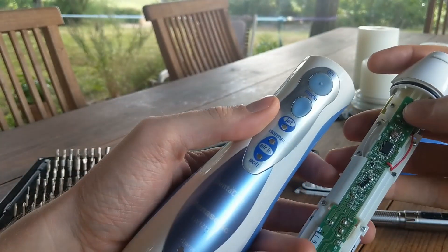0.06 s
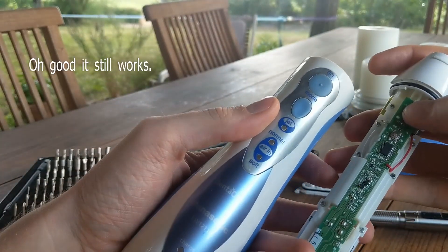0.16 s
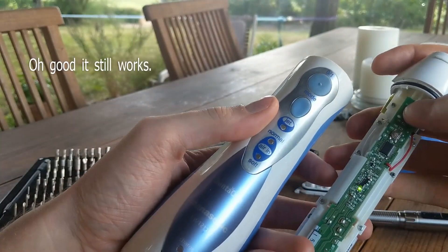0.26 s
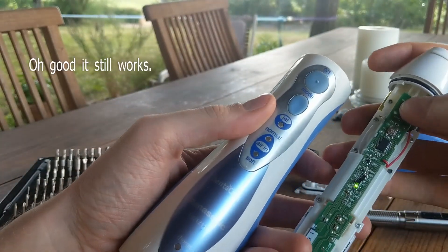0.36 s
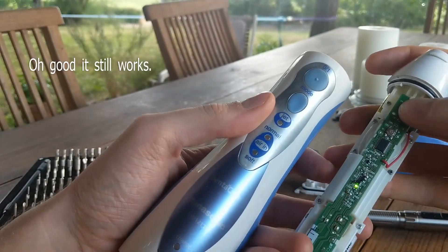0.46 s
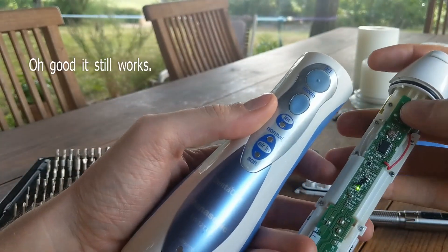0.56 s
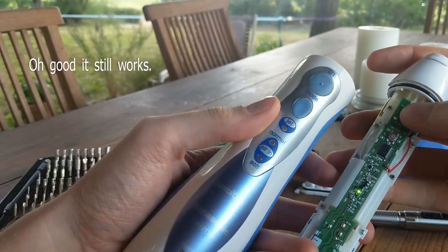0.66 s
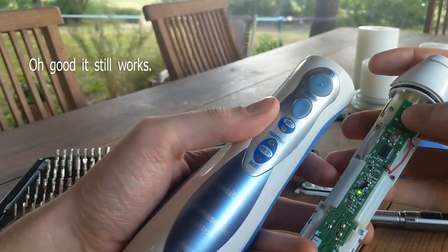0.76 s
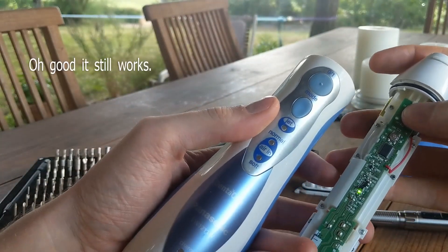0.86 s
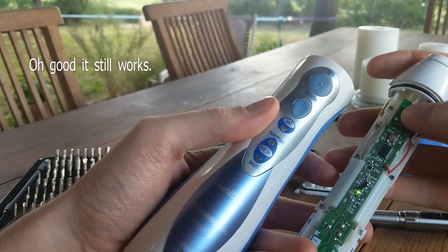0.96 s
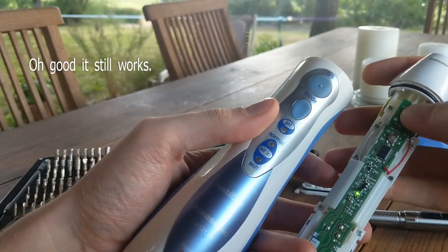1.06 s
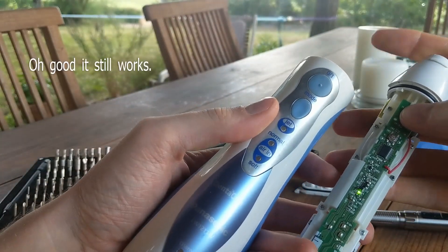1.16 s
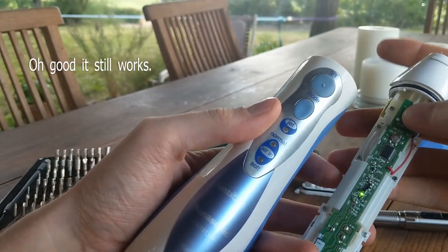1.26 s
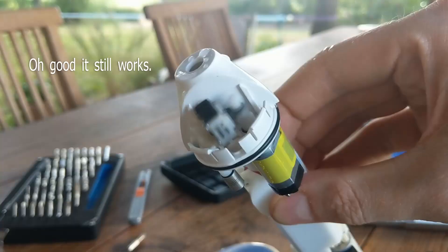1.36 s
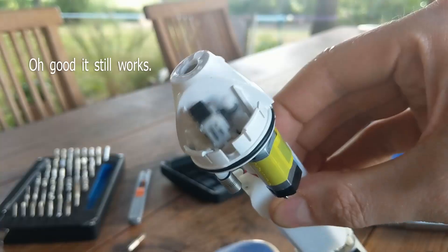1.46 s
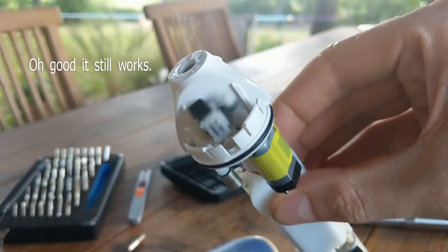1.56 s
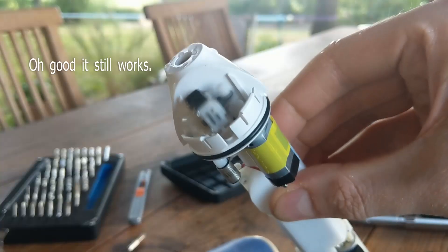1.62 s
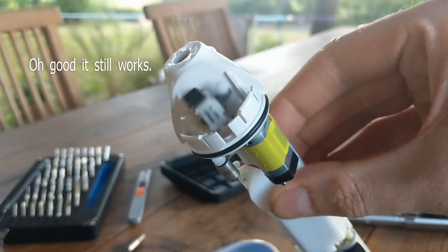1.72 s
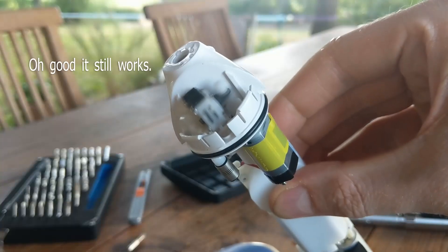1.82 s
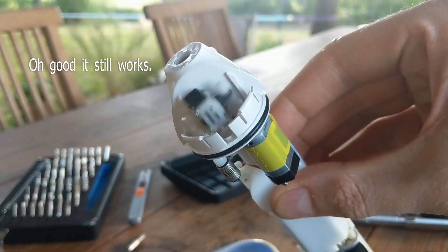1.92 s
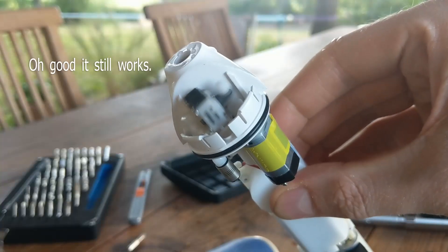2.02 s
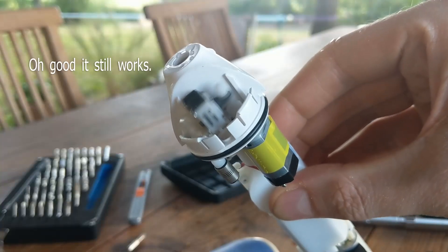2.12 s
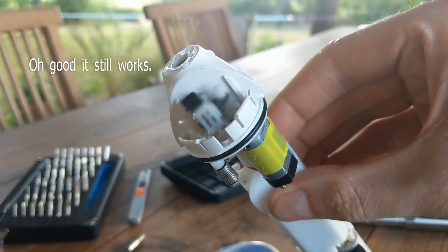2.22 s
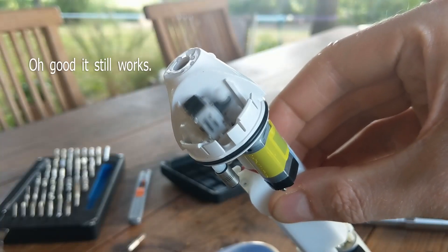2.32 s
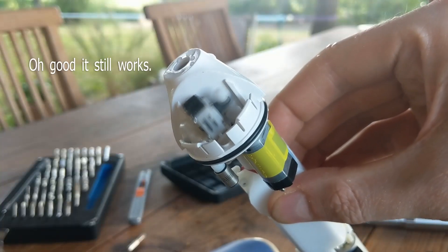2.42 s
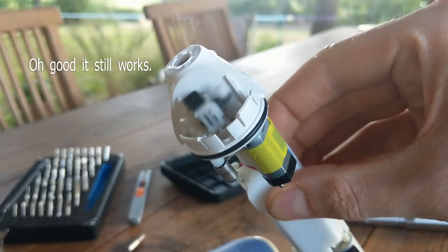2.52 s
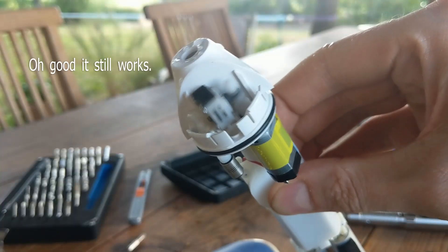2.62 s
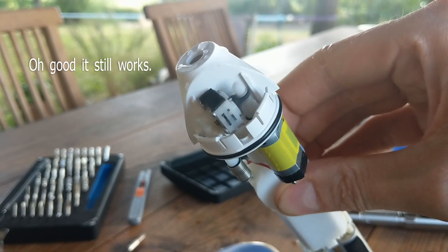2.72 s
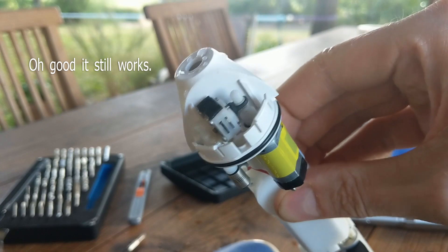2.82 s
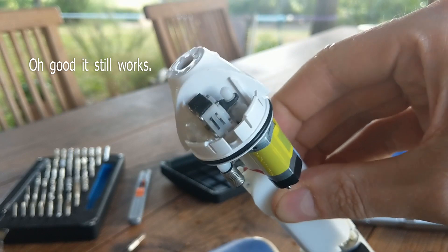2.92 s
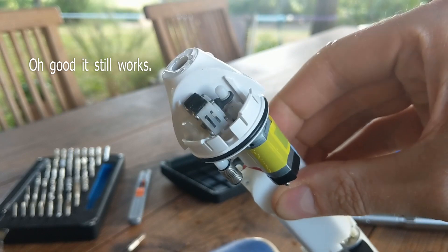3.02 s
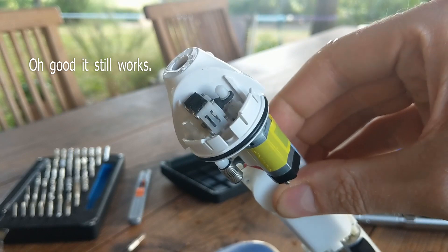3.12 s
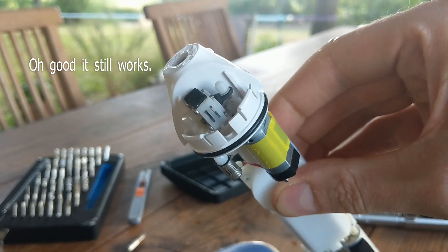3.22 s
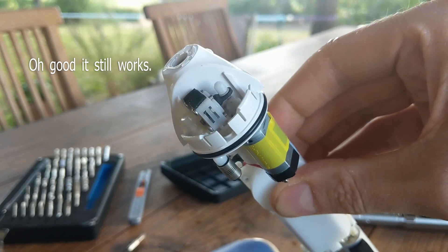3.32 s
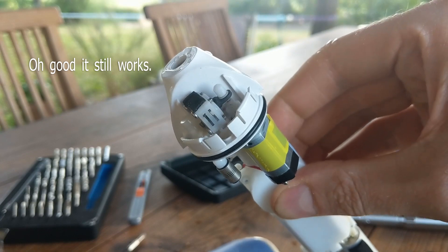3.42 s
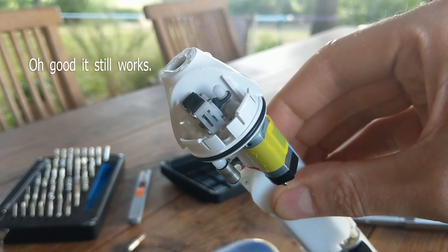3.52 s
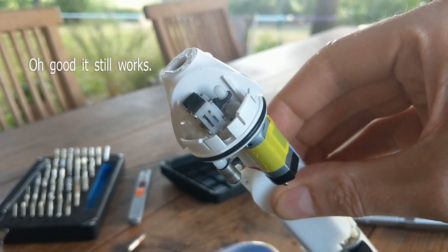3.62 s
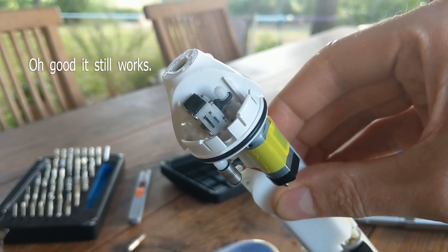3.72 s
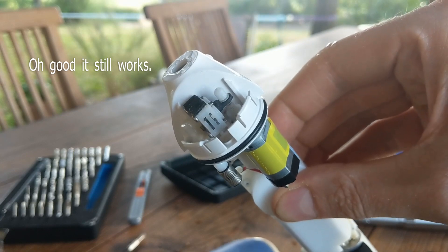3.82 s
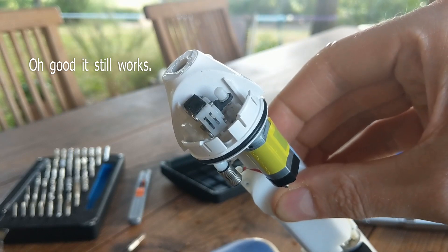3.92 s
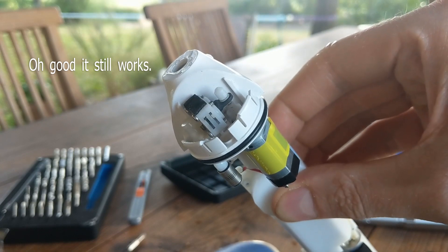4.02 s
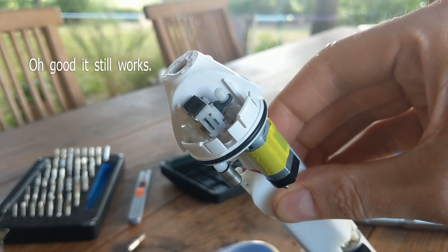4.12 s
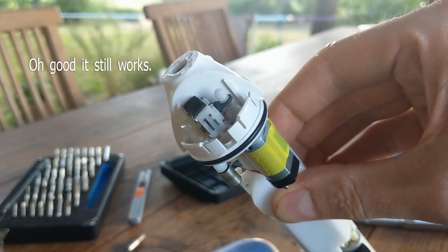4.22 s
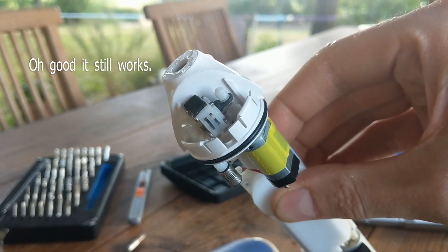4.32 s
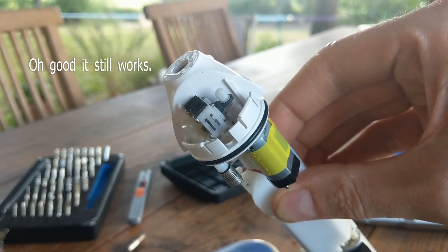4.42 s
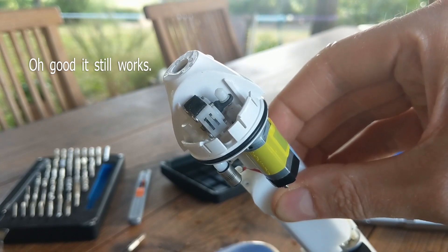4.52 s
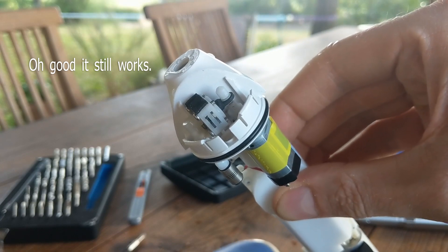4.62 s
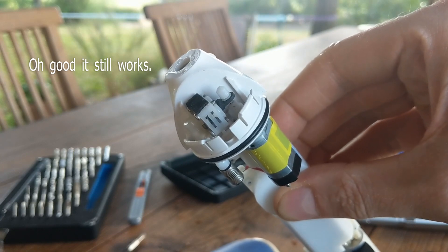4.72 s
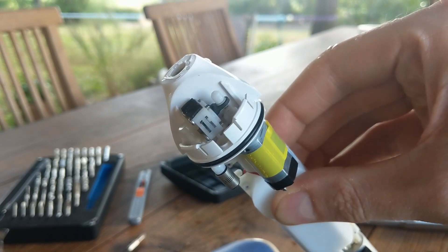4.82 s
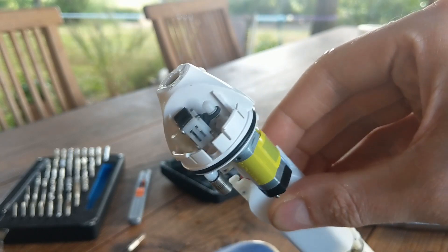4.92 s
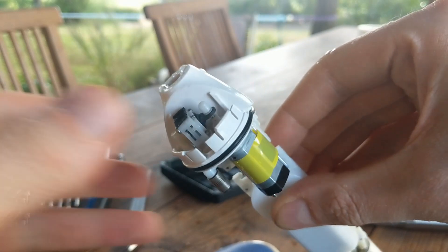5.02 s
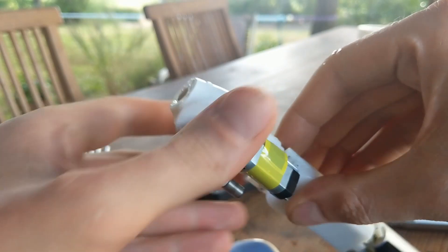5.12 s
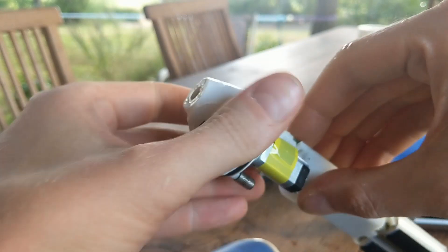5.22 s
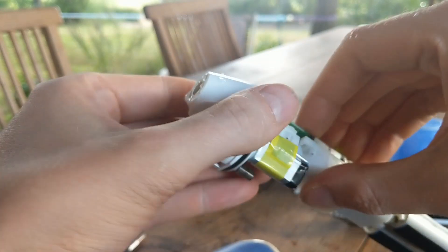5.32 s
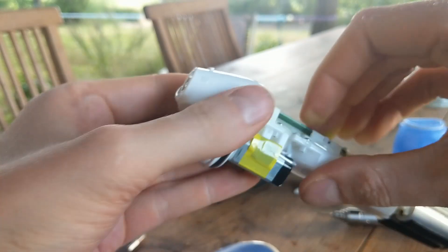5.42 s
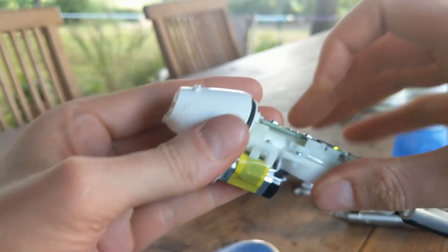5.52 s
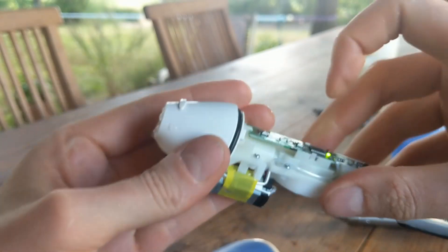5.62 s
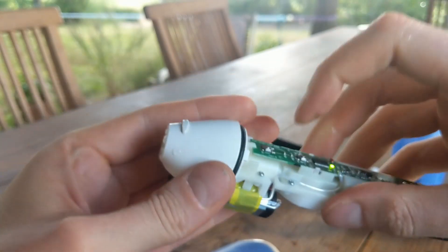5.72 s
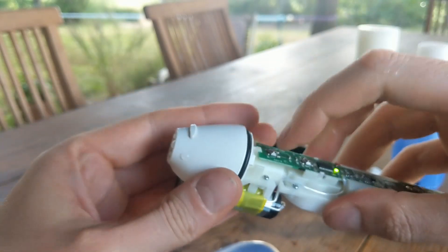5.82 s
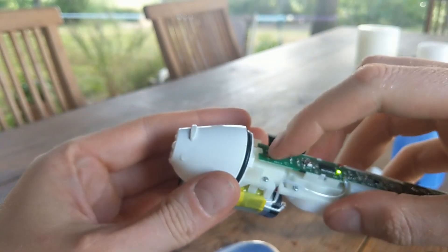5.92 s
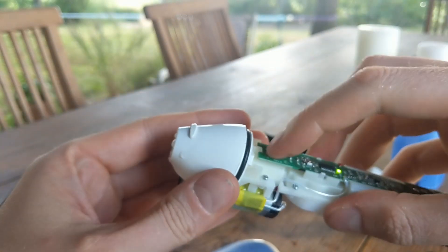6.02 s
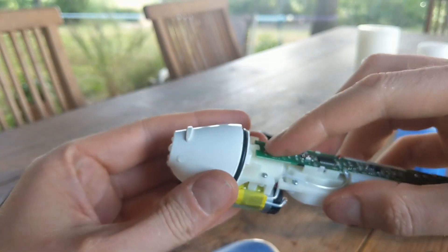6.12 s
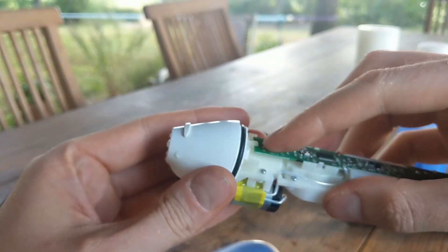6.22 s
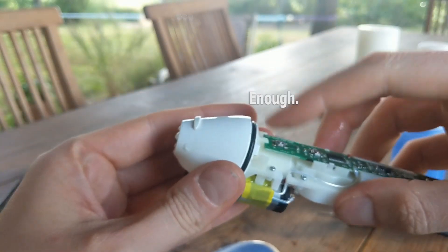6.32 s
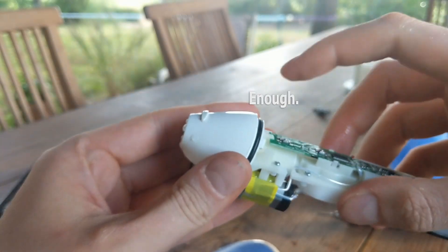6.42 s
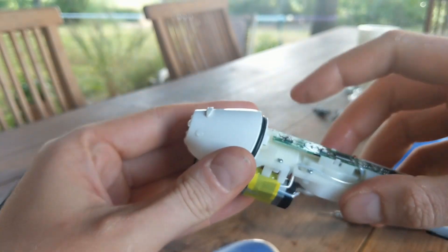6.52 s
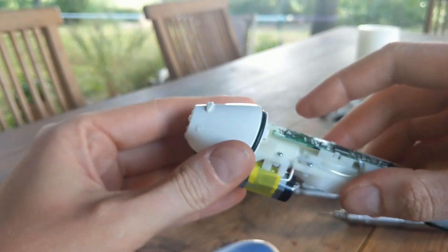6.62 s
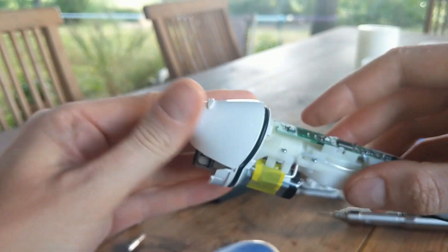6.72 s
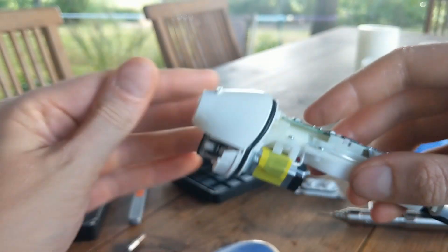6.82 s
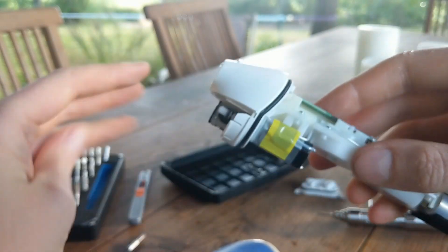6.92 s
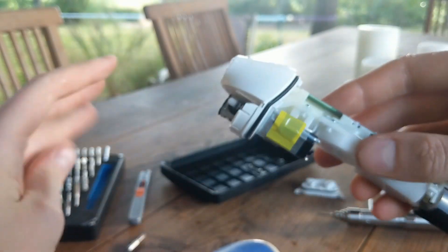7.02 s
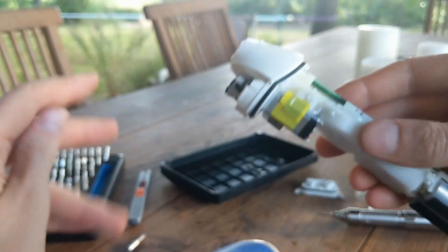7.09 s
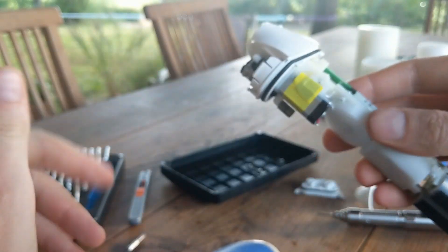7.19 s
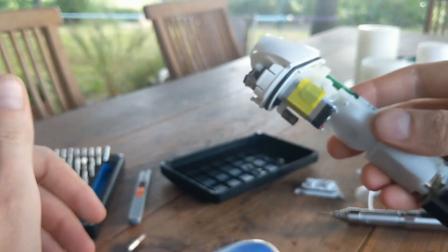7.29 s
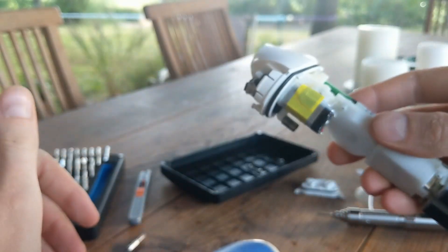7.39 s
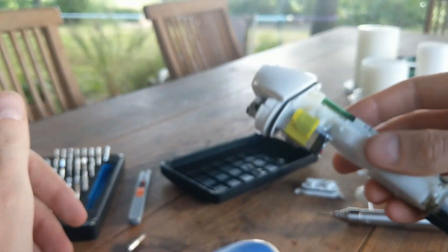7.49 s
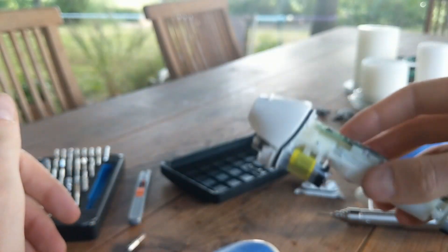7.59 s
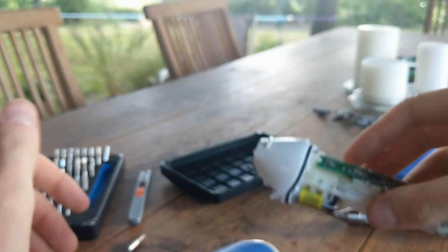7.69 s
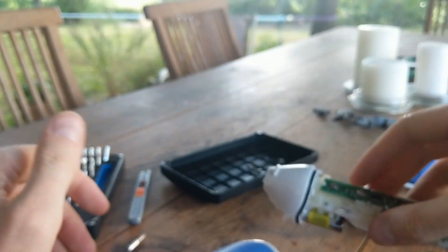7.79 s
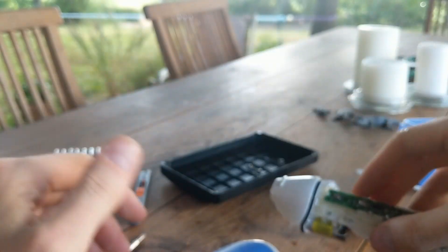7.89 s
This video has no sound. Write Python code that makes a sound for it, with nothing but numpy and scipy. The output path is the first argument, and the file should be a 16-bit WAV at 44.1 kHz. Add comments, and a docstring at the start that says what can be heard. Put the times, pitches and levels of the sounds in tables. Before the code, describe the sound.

Quiet outdoor air and a faint, distant engine drone lie under everything, and all sound is on the left channel. At about 0.3 seconds the small motor of an opened water flosser starts buzzing close by, its pitch wavering slightly. From 0.9 to 1.4 seconds loose parts clack quickly and dully. The buzz then turns abruptly brighter and closer, and near 1.9 seconds it dips in pitch and grows more rattly. It stops with sharp clicks at around 2.8 seconds. At 3.3 seconds another click restarts it, now pumping hard with rapid, even gear thuds, rasping and ticks. From about 5 seconds a hand cups the pump head, shifting the tone, with a hollow thumb knock at 5.4 seconds. The pump winds down quickly at 6.3 seconds with a small click. Fingers brush faintly over the plastic near 6.5 seconds and again just after 7.

```python
"""At a table outdoors, the small pump drive of an opened water flosser is run twice in the hand.
First it buzzes: the shaft knocks on the housing once a turn, the gear throbs and loose parts clack.
Then it pumps hard, its gear thudding and rasping under the load of each stroke, and a hand cups the
pump head. Fingers brush the plastic; a far engine drones in the quiet air. Only the left channel is live.
"""
import sys
import numpy as np
from scipy import signal
from scipy.fft import rfft, irfft
from scipy.io import wavfile
from scipy.ndimage import map_coordinates

SR = 44100
rng = np.random.default_rng(int(sys.argv[2]) if len(sys.argv) > 2 else 0)


def to_wav(s):
    """Save 16-bit WAV."""
    ch = np.atleast_2d(s).T  # columns
    pcm = np.round(np.clip(ch, -1, 1) * 32767)  # PCM
    wavfile.write(sys.argv[1], SR, pcm.astype(np.int16))


N = 350639
TIME = np.arange(N) / SR
# hollow of the hand cupped round the pump head: pitch_hz, width_hz, gain_db
HAND_HOLLOW = [(1503, 270, 0)]


def from_db(db):
    """Decibels to gain."""
    return 10 ** (np.asarray(db) / 20)


def rms_one(x):
    """Scale to rms 1."""
    return x / np.sqrt(np.mean(x ** 2) + 1e-20)


def along(rows):
    """One automation curve per column after the time, in straight lines."""
    times, *columns = np.transpose(rows)
    return [np.interp(TIME, times, column) for column in columns]


def blend(first, second, share):
    """Constant-power crossfade."""
    share = np.clip(share, 0, 1)
    return np.sqrt(1 - share) * first + np.sqrt(share) * second


def swell(age, attack, hold, release):
    """Rise, hold, then die away."""
    return np.clip(age / attack, 0, 1) * np.exp(-np.maximum(age - attack - hold, 0) / release)


def noise():
    """White noise."""
    return rng.standard_normal(N)


def drift(rate_hz):
    """Random wander between points of spread 1."""
    knots = rng.standard_normal(4000)
    return np.interp(TIME * rate_hz, np.arange(len(knots)), knots)


def add(out, start_s, sound):
    """Mix a sound in at a time."""
    start = round(start_s * SR)
    out[start:start + len(sound)] += sound[:N - start]


def butter(x, order, hz, kind):
    """Low-, high- or band-pass filter."""
    return signal.sosfilt(signal.butter(order, hz, kind, fs=SR, output="sos"), x)


def colour(x, spectrum, size=4096):
    """Minimum-phase EQ with the given curve, rolled off beyond its ends; rms 1."""
    hz, db = np.transpose(spectrum)
    grid = np.maximum(np.fft.rfftfreq(size, 1 / SR), 1)
    octaves_outside = np.abs(np.log2(grid / np.clip(grid, hz[0], hz[-1])))
    curve_db = np.interp(np.log(grid), np.log(hz), db) - 20 * np.minimum(octaves_outside, 2)
    cepstrum = irfft(np.log(from_db(curve_db)))
    cepstrum[1:size // 2] *= 2
    cepstrum[size // 2 + 1:] = 0
    impulse = irfft(np.exp(rfft(cepstrum)))
    return rms_one(signal.oaconvolve(x, impulse)[:N])


def bent_colour(x, spectrum, ratio):
    """EQ whose peaks slide in pitch by the given ratio."""
    clock = np.cumsum(ratio)
    warped = map_coordinates(x, [np.interp(np.arange(N), clock, np.arange(N))], order=3)
    return map_coordinates(colour(warped, spectrum), [clock], order=3)


def pole_pair(hz, width_hz):
    """Feedback coefficients of one resonance."""
    radius = np.exp(-np.pi * width_hz / SR)
    return [1, -2 * radius * np.cos(2 * np.pi * hz / SR), radius * radius]


def resonate(x, modes):
    """Parallel resonances of alternating sign."""
    x = x + 1e-18 * (np.arange(len(x)) % 3)   # keeps the tails clear of denormals
    out = 0
    for k, (hz, width, db) in enumerate(modes):
        poles = pole_pair(hz, width)
        gain = (-1) ** k * from_db(db) * (1 - poles[2]) / 2
        out = out + gain * signal.lfilter([1, 0, -1], poles, x)
    return out


def build_up(x, resonances):
    """All-pass resonances: the sound near each arrives a few milliseconds late."""
    for hz, width in resonances:
        poles = pole_pair(hz, width)
        x = signal.lfilter(poles[::-1], poles, x)
    return x


def contacts(turns, spread_db, jitter_s=0):
    """A click at every whole turn, each with its own strength and a small timing slip."""
    at = np.interp(np.arange(np.ceil(turns[0]), turns[-1]), turns, np.arange(N))
    size, late = rng.standard_normal((6000, 2))[:len(at)].T
    near = at.astype(int)
    at = at + late * (jitter_s * SR * np.ones(N))[near]
    strength = from_db(size * (spread_db * np.ones(N))[near])
    taps = at.astype(int)[:, None] + np.arange(-7, 9)
    offset = taps - at[:, None]
    # a windowed sinc lets each click land between samples
    clicks = np.sinc(offset) * np.cos(np.pi * offset / 16) ** 2 * strength[:, None]
    return rms_one(np.bincount(np.clip(taps, 0, N - 1).ravel(), clicks.ravel(), N))


def friction(cycles, fresh, size=1600):
    """The same worn surface passes on every cycle, so part of the scraping repeats."""
    surface = rng.standard_normal(size)
    repeating = map_coordinates(surface, [cycles % 1 * size], order=3, mode="grid-wrap")
    return rms_one(repeating + fresh * noise())


def tooth_knocks(strokes, spread_db=1.0, jitter_s=5e-5, count=5):
    """Teeth strike one after another in a fading run as the piston's load comes on."""
    # push and pull: start_strokes, spacing_strokes, level_db, loss_per_tooth_db, first_tooth_extra_db
    runs = [(.003, .068, 0, 2.6, -1), (.494, .075, -3, 2.2, 4.5)]
    out = 0
    for start, spacing, db, loss_db, first_db in runs:
        for k in range(count):
            gain = from_db(db - loss_db * k + first_db * (k == 0))
            out = out + gain * contacts(strokes - start - k * spacing, spread_db, jitter_s)
    return rms_one(out)


def blows(events, modes, grit, grit_s, size=3000):
    """At each event a click with a short gritty tail rings a few resonances."""
    t = np.arange(size) / SR
    tail = grit * np.exp(-t / grit_s) + 0.005 * np.exp(-t / 0.03)
    out = np.zeros(N)
    for start_s, db in events:
        force = (t == 0) + rng.standard_normal(size) * tail
        ring = butter(resonate(force, modes), 2, 580, "high")
        add(out, start_s, from_db(db) * ring / np.abs(ring).max())
    return out


def far_engine(pitch_hz=71.7, trim_db=-10.5, third_db=-16):
    """A distant engine drones, wavering in pitch and level."""
    # fader of the drone: time_s, level_db
    fader = [(0, -58), (1.3, -90), (1.45, -57), (4.2, -59), (6.2, -53), (7.95, -57)]
    level_db, = along(fader)
    phase = 2 * np.pi * np.cumsum(pitch_hz + 2.92 * drift(14)) / SR
    tone = np.sqrt(2) * (np.sin(phase) + from_db(third_db) * np.sin(3 * phase))
    return tone * from_db(level_db + trim_db + 3.84 * drift(11))


def outdoor_air(gain_db=-68.5):
    """A soft, dark bed of open air."""
    # colour of the air: frequency_hz, level_db
    air_eq = [(25, -36.5), (48, -7), (80, -9.5), (125, -10.5), (170, -17), (216, -17.5), (260, -20.5),
              (500, -25), (1200, -28.5), (2000, -32), (7000, -40.5), (15600, -46.5)]
    return from_db(gain_db) * colour(noise(), air_eq)


def housing(force, speed, usual_hz, ring_follows=.2, soft_below_hz=131, soft_range_hz=14):
    """The housing rings under the shaft's knocks, dull at first, then abruptly closer and brighter."""
    # colour of the dull tone, and of the close tone in a firm and a slack grip: frequency_hz, level_db
    dull_eq = [(400, -25), (580, -42), (690, -24), (1705, -25.5), (1975, -8.5), (2155, -29), (2400, -6),
               (2740, 2), (2965, -9.5), (3190, -7), (3685, -17.5), (4045, -8), (4405, -17), (4765, -1),
               (5250, -14.5), (5470, -11), (5710, -24), (6295, -18), (6925, -22.5), (7700, -24),
               (8150, -10.5), (8400, -21.5), (8750, -15), (10200, -32.5), (11500, -39), (14440, -36),
               (15475, -62)]
    firm_eq = [(430, -33.5), (570, -20), (715, -13), (860, -14), (1000, -70), (1290, -27), (1430, -16),
               (1860, -28), (2010, -17), (2300, -15), (2580, 1.5), (2870, 3.5), (3020, -9), (3160, -14),
               (3300, -5.5), (3650, -3.5), (4000, -3.5), (4280, -10), (4850, 1), (5130, -6), (5280, 2.5),
               (5450, -6.5), (6700, -5), (7600, -12.5), (8350, 4), (8950, -18.5), (9330, -5), (9700, -12),
               (10600, -22), (12000, -27), (13500, -27), (15500, -37)]
    slack_eq = [(450, -22.5), (700, -18.5), (1200, -26), (1450, -20.5), (2280, -22.5), (2390, -10.5),
                (2510, -15), (2650, 1), (2790, -0.5), (2930, -6.5), (3180, -5), (3320, -11), (3850, -4),
                (3990, -15), (4250, -8), (4520, -11.5), (4780, -5), (5040, -3), (5170, -19), (5320, -7),
                (5600, -10.5), (6700, -11), (7800, -12.5), (8050, -3.5), (8400, -4.5), (8900, -9.5),
                (9300, -19), (9800, -14.5), (10200, -26), (13500, -31), (15500, -43)]
    # resonances that build up late, so each knock swells after its tick: pitch_hz, width_hz
    late_dull = [(2700, 580), (3900, 130), (4770, 360), (8300, 140)]
    late_close = [(3000, 100), (3800, 150), (4800, 170)]
    # the knocking switches abruptly to a closer, brighter tone with sharp ticks: time_s, share
    close_curve = [(1.395, 0), (1.398, 1)]
    # the grip slackens: time_s, share
    slack_curve = [(1.885, 0), (1.91, 1)]
    (close,), (slack,) = along(close_curve), along(slack_curve)
    bend = (speed / usual_hz) ** ring_follows
    dull = build_up(bent_colour(force + .3 * noise(), dull_eq, bend), late_dull)
    # a slow shaft lands softly and loses its treble
    softness = np.clip((soft_below_hz - speed) / soft_range_hz, 0, .8)
    dull = dull + softness * (butter(dull, 4, 3300, "low") - dull)
    bright = blend(colour(force, firm_eq), colour(force, slack_eq), slack)
    return blend(dull, build_up(bright, late_close), close)


def gear_throb(turns, scrape, turns_per_stroke=6, push_at_s=2.272):
    """The gear rattles with each push and pull of the piston, geared down from the shaft."""
    # colour of the rattle: frequency_hz, level_db
    rattle_eq = [(200, -3.5), (330, -1.5), (450, -3.5), (560, -8), (720, 3.5), (880, 0.5), (1100, -4),
                 (1450, -2), (1800, -7), (2300, -12), (4000, 1.5)]
    strokes = (turns - np.interp(push_at_s, TIME, turns)) / turns_per_stroke
    return colour(tooth_knocks(strokes, spread_db=2, jitter_s=9e-5) + .5 * scrape, rattle_eq)


def buzz(on_s=0.344, off_s=2.855, fade_s=0.0039, stall_hz=98, usual_hz=138.25, throb_db=-52.5):
    """The unbalanced shaft hums and knocks once a turn; when loose it chatters and its gear throbs."""
    # shaft speed: time_s, turns_per_s
    speed_curve = [(.345, 115), (.368, 120), (.385, 133), (.45, 134), (.525, 142), (.555, 134.5),
                   (.62, 138), (.65, 136.5), (.68, 140.5), (.735, 141.8), (.755, 128), (.92, 133.7),
                   (1.0, 139.7), (1.05, 138.7), (1.12, 133.5), (1.16, 116), (1.235, 120), (1.27, 131.4),
                   (1.31, 134), (1.38, 135), (1.395, 137.4), (1.47, 136.4), (1.5, 144.6), (1.56, 143),
                   (1.65, 144), (1.71, 142.8), (1.77, 143.7), (1.885, 141.4), (1.905, 126), (1.95, 132),
                   (2.14, 131.5), (2.25, 133), (2.64, 132.6), (2.7, 131), (2.84, 130.3)]
    # looseness of the shaft: time_s, share
    loose_curve = [(.35, 0.04), (.75, 0.15), (.9, 0.65), (1.4, 0.72), (1.46, 0.72), (1.54, 0.15),
                   (1.88, 0.17), (1.93, 0.99), (2.85, 0.79)]
    # fader of the knocking at the usual speed: time_s, level_db
    fader = [(.36, -43), (.385, -46), (.48, -43), (.72, -43), (1.0, -44), (1.385, -46), (1.398, -40),
             (1.53, -38.5), (1.87, -40.5), (1.95, -42), (2.83, -40)]
    # hum of the unbalance: harmonic, level_db
    unbalance = [(1, -65), (2, -69.5)]
    (speed,), (loose,), (level_db,) = map(along, (speed_curve, loose_curve, fader))
    turns = np.cumsum(speed * (1 + .0007 * drift(25) + .002 * loose * drift(60))) / SR
    scrape = rms_one(friction(turns, fresh=1.8, size=340) * np.exp(-(turns % 1) / 1.5))
    chatter = .55 * loose * scrape
    force = contacts(turns, spread_db=1.8 * loose, jitter_s=1.1e-5 * loose) + chatter
    # the shaft hits harder the further its speed lies above the stall
    force_db = 20 * np.log10(np.maximum(speed - stall_hz, 1) / (usual_hz - stall_hz))
    knock = housing(force, speed, usual_hz) * from_db(level_db + 0.85 * force_db)
    throb = gear_throb(turns, scrape) * loose * from_db(throb_db)
    hum = sum(np.sqrt(2) * from_db(db) * np.sin(2 * np.pi * k * turns) for k, db in unbalance)
    gate = np.clip(np.minimum(TIME - on_s, off_s - TIME) / fade_s, 0, 1)
    return gate * (knock + throb + hum)


def loose_clacks():
    """Loose parts strike with dull, midrange clacks."""
    # clacks: start_s, level_db
    cues = [(0.865, -21.5), (0.875, -24.5), (0.914, -20.5), (0.925, -37), (0.961, -30.5), (1.008, -23.5),
            (1.058, -25.5), (1.111, -33), (1.1656, -28.5), (1.2215, -29.5), (1.2743, -29), (1.329, -27.5),
            (1.383, -26)]
    # ring of a loose part: pitch_hz, width_hz, gain_db
    part_modes = [(1660, 250, -5.5), (1900, 150, 5.5), (2590, 700, 2)]
    return butter(blows(cues, part_modes, grit=0.3, grit_s=0.001), 3, [1450, 2550], "band")


def frame_jolts():
    """The whole frame jolts sharply as the drive stalls, stops and starts."""
    # jolts: start_s, level_db
    cues = [(1.1495, -30.5), (2.8168, -22), (2.824, -18), (2.866, -19), (2.908, -46), (3.288, -16),
            (3.328, -27.5), (6.343, -42), (6.376, -57)]
    # ring of the frame: pitch_hz, width_hz, gain_db
    frame_modes = [(1280, 270, -7), (2720, 400, -11), (3720, 470, 3), (4130, 1230, -4.5),
                   (6070, 1300, -13.5), (8430, 600, -21)]
    return blows(cues, frame_modes, grit=0.22, grit_s=0.00058)


def gear_run_out(scrape):
    """The gear scrapes briefly as it stops and starts."""
    # scrapes: start_s, hold_s, level_db
    cues = [(2.847, 0.012, -49), (3.279, 0.0016, -51), (3.298, 0.0034, -43.5), (3.319, .008, -46),
            (6.329, 0.037, -57.5)]
    # ring of the gear: pitch_hz, width_hz, gain_db
    gear_modes = [(4050, 510, 9), (7600, 2400, -13.5)]
    envelope = sum(from_db(db) * swell(TIME - s, 0.0052, hold_s, 0.0051) for s, hold_s, db in cues)
    return rms_one(resonate(scrape, gear_modes)) * envelope


def piston_load(strokes, idle_force_db=-1.5, idle_friction_db=-9):
    """Tooth force and friction in dB: a long push and a sharp pull per stroke, idling in between."""
    # push and pull: start_strokes, attack_strokes, hold_strokes, release_strokes, force_db, friction_db
    half_strokes = [(0.94, 0.046, 0.22, 0.027, 2, -2.5), (0.4534, 0.042, 0.011, 0.078, 0, -4)]
    force, drag = from_db(idle_force_db), from_db(idle_friction_db)
    for start, attack, hold, release, force_db, friction_db in half_strokes:
        effort = swell((strokes - start) % 1, attack, hold, release)
        force = force + from_db(force_db) * effort
        drag = drag + from_db(friction_db) * effort ** 2
    return 20 * np.log10(force), 20 * np.log10(drag)


def gear_thud(force, bedded, held, gain_db=-52, damping_db=1.5):
    """Tooth force thuds through the gear case, whose tone shifts as it beds in and is held."""
    # case running free, bedded in, muffled by the hand: pitch_hz, width_hz, gain_db
    free_modes = [(287, 81, -2), (594, 72, 7), (830, 430, -1), (1187, 133, 4), (1397, 128, 5),
                  (2200, 290, -22)]
    bedded_modes = [(195, 47, -2), (393, 85, -6.5), (568, 160, 1), (721, 350, 6), (1012, 28, 1),
                    (1250, 207, 2.5), (1405, 190, 2.5), (1970, 370, -15.5)]
    held_modes = [(367, 170, -6), (575, 120, 0.5), (722, 166, 4), (980, 110, 3.5), (1360, 180, 0.5),
                  (1600, 360, -4)]
    thud = blend(rms_one(resonate(force, free_modes)), rms_one(resonate(force, bedded_modes)), bedded)
    thud = blend(thud, rms_one(resonate(force, held_modes)), held ** 2)
    return butter(thud, 2, 160, "high") * from_db(gain_db - damping_db * held ** 2)


def gear_rasp(scrape, hits, force_db, friction_db, held, shell_share=0.58):
    """Teeth scrape under load and ring the open shell; returns the rasp and its bright top layer."""
    # colours of both layers, open and with a hand round the pump head: frequency_hz, level_db
    rasp_open = [(1060, -41.5), (1800, -14), (2200, -15.5), (2380, -16.5), (2660, -10.5), (3370, -6.5),
                 (3680, -4.5), (4220, -14.5), (4650, -6), (5390, -11.5), (5800, -15.5), (7540, -28),
                 (12800, -120)]
    rasp_held = [(1060, -24), (1800, -6.5), (2080, -13.5), (2390, -1.5), (2690, -6.5), (2940, -1),
                 (3340, -12.5), (3660, -6.5), (3960, -4.5), (4960, 0.5), (5800, -6), (7540, -21.5),
                 (12800, -120)]
    bright_open = [(3240, -32.5), (5500, -10), (5900, -0.5), (6230, -8.5), (6510, 0.5), (6870, -6),
                   (7260, 5), (7700, -3.5), (8100, 2.5), (8410, -5.5), (9050, -13), (10000, -20.5),
                   (11400, -20), (13700, -20), (14600, -23.5), (15600, -38)]
    bright_held = [(3240, -49), (5500, -7.5), (5980, -7), (6440, -2), (6810, -7.5), (7340, -5.5),
                   (8150, -7), (8980, -22), (9580, -36.5), (10600, -29), (11700, -20), (13400, -29),
                   (15600, -42.5)]
    # shell of the pump head: pitch_hz, width_hz, gain_db
    shell_modes = [(2600, 150, -11.5), (3170, 80, -17), (3707, 120, -3), (4600, 180, -3)]
    # faders of the scraping: time_s, rasp_db, bright_db
    faders = [(3.36, -49, -47.5), (4.4, -50, -50), (5.4, -51, -51), (5.65, -46.5, -50), (5.95, -49, -47.5),
              (6.28, -49, -49)]
    rasp_db, bright_db = along(faders)
    rasp = scrape * from_db(0.58 * friction_db + 0.047 * force_db)
    rasp = blend(colour(rasp, rasp_open), colour(rasp, rasp_held), held)
    shell = shell_share * np.sqrt(1 - held) * rms_one(resonate(hits, shell_modes))
    bright = scrape * from_db(friction_db)
    bright = blend(colour(bright, bright_open), colour(bright, bright_held), held)
    return (rasp + shell) * from_db(rasp_db), bright * from_db(bright_db)


def crank_snap(strokes, bedded, held, free_db=-60.5, held_db=-46.5):
    """Every second stroke the play in the crank snaps over and bounces once."""
    # colour of the snap: frequency_hz, level_db
    snap_eq = [(3000, -9.5), (4800, -22), (6300, -1), (7100, -0.5), (8200, -7), (9600, -27.5), (11800, -19),
               (15500, -37)]
    cycles = (strokes - 0.34 - 0.065 * held) / 2   # lands a little later when held
    grit = rms_one(noise() * np.exp(-(cycles % 1) / 0.013))
    click = contacts(cycles, spread_db=1.3)
    bounce = contacts(cycles - 0.027, spread_db=1.7)
    # fades as the gear beds in and comes back hard under the hand
    gain = (1 - bedded) * from_db(free_db) + held ** 3 * from_db(held_db)
    return colour(click + 0.69 * bounce + 2.3 * grit, snap_eq) * gain


def tooth_slips(strokes, held):
    """The last teeth of each push slip with a tick, a little softer under the hand."""
    # slips: position_strokes, level_db
    slips = [(.15, -55), (.195, -56.5)]
    # ring of a slip: pitch_hz, width_hz, gain_db
    slip_modes = [(3700, 160, 2), (4900, 260, -8), (6870, 190, -8), (6920, 410, -1), (7980, 270, 0.5)]
    out = 0
    for position, db in slips:
        ticks = contacts(strokes - position, spread_db=1.2, jitter_s=0.000195)
        out = out + from_db(db) * rms_one(resonate(ticks, slip_modes))
    return out * (1 - 0.24 * held)


def pump(on_s=3.295, off_s=6.285, push_at_s=4.411, take_up_s=0.035, coast_db_per_s=245, tooth_count=14):
    """Gear teeth mesh and scrape under the swinging load of the piston, then coast to rest."""
    # pumping speed: time_s, strokes_per_s
    stroke_rate = [(3.3, 28.89), (3.55, 29.63), (3.85, 28.53), (4.8, 27.4), (5.2, 27.32), (5.5, 27.67),
                   (5.9, 27.19), (6.3, 27.23)]
    # the gear beds in, later the hand closes round the pump head: time_s, share
    bedded_curve = [(4.05, 0), (4.2, 0.89)]
    grip_curve = [(5.0, 0.08), (5.6, 0.95)]
    (rate,), (bedded,), (held,) = map(along, (stroke_rate, bedded_curve, grip_curve))
    strokes = np.cumsum(rate) / SR
    strokes = strokes - np.interp(push_at_s, TIME, strokes)
    force_db, friction_db = piston_load(strokes)
    # the gear slows under each push and pull, so its teeth meet unevenly
    mesh = tooth_count * strokes - 0.398 + 0.1164 * np.sin(4 * np.pi * strokes)
    teeth = contacts(mesh, spread_db=1.8, jitter_s=8e-5)
    hits = tooth_knocks(strokes)
    drag = rms_one(from_db(force_db) * friction(strokes, fresh=0.69))
    force = hits + .3 * drag
    swing = from_db(.5 * np.cos(np.pi * strokes) + 0.24 * drift(82))   # strong and weak strokes alternate
    scrape = friction(strokes, fresh=1.0) * from_db(0.68 * drift(1500)) + 0.53 * teeth
    rasp, bright = gear_rasp(scrape * swing, hits, force_db, friction_db, held)
    body = gear_thud(force, bedded, held) + cupped_hand(force) + rasp
    top = bright + crank_snap(strokes, bedded, held) + tooth_slips(strokes, held)
    coast = from_db(-coast_db_per_s * np.maximum(TIME - off_s, 0))
    drive = np.clip((TIME - on_s) / take_up_s, 0, 1) * coast
    # the bright sounds come last and go first
    return drive * body + drive ** 2 * top + gear_run_out(scrape)


def cupped_hand(force):
    """The gear rings the hollow of the hand as it cups the pump head."""
    # fader of the hollow ring: time_s, level_db
    fader = [(3.3, -100), (5.2, -70), (5.45, -57.5), (5.65, -66), (6.25, -83)]
    level_db, = along(fader)
    return rms_one(resonate(resonate(force, HAND_HOLLOW), HAND_HOLLOW)) * from_db(level_db)


def thumb_knock(trim_db=4.5):
    """A thumb knocks the cupped head and rings the hollow."""
    # knock: start_s, level_db
    cues = [(5.4106, -28.5)]
    knock = blows(cues, HAND_HOLLOW, grit=0.25, grit_s=0.0014)
    return from_db(trim_db) * butter(knock, 3, [1450, 2550], "band")


def finger_brushes():
    """Skin slides briefly over plastic with a faint hiss."""
    # brushes: centre_s, level_db, half_width_s
    cues = [(6.472, -63, 0.0018), (7.018, -74.5, 0.017), (7.071, -68.5, 0.015), (7.246, -78, .015),
            (7.31, -76.5, 0.032)]
    touch = sum(from_db(db) * np.exp(-((TIME - s) / width_s) ** 2) for s, db, width_s in cues)
    # colour of the hiss: frequency_hz, level_db
    skin_eq = [(2000, -14), (5000, -8), (7500, -3), (9500, -17), (15000, -22)]
    return touch * colour(noise(), skin_eq)


def scene():
    """Drive, handling and outdoor bed, all on the left channel."""
    flosser = buzz() + pump() + loose_clacks() + thumb_knock() + frame_jolts()
    mix = flosser + finger_brushes() + far_engine() + outdoor_air()
    return np.array([2 * mix, np.zeros(N)])


def record(dry, cutoff_hz=15800):
    """A steep low-pass cuts off the very top."""
    return signal.sosfilt(signal.ellip(12, .1, 80, cutoff_hz, fs=SR, output="sos"), dry)


dry = scene()
out = record(dry)
to_wav(out)
```